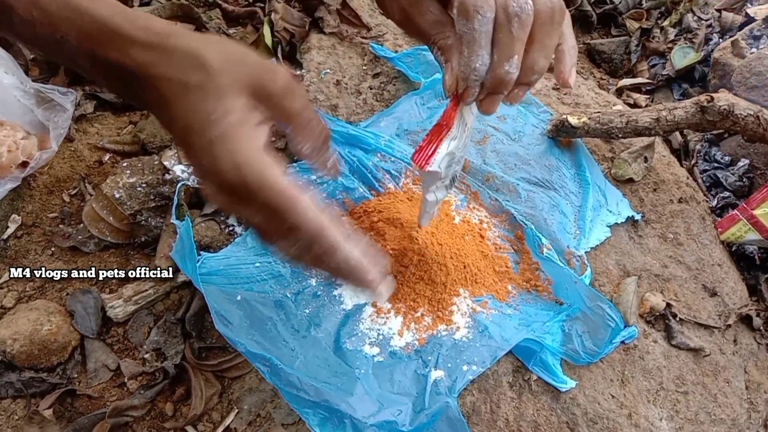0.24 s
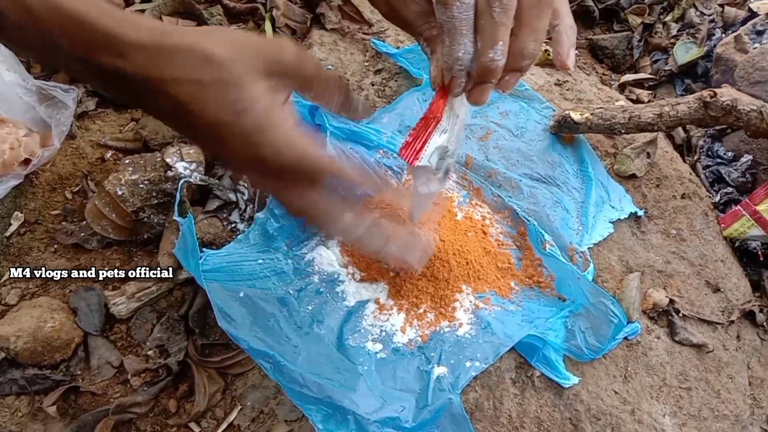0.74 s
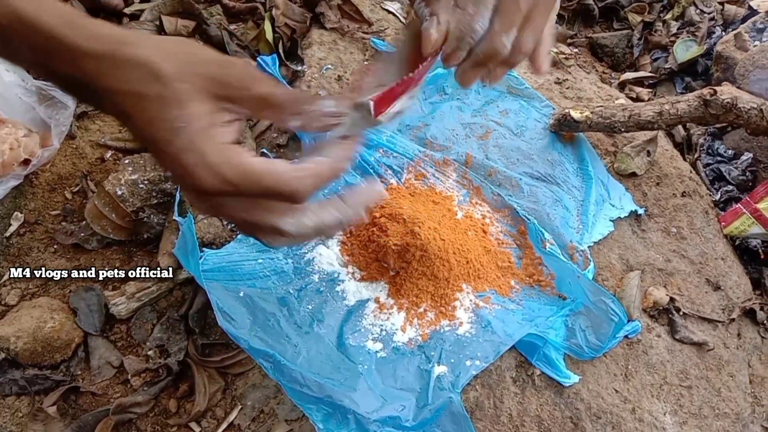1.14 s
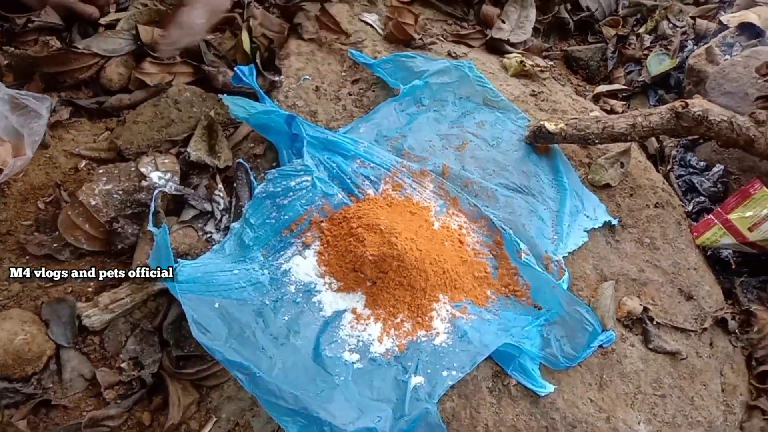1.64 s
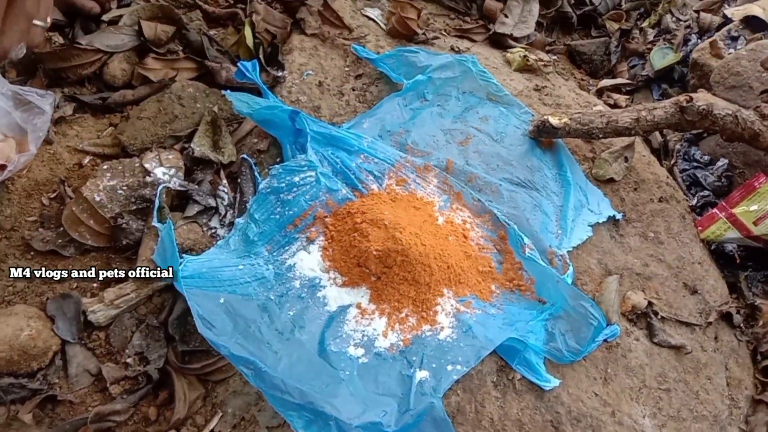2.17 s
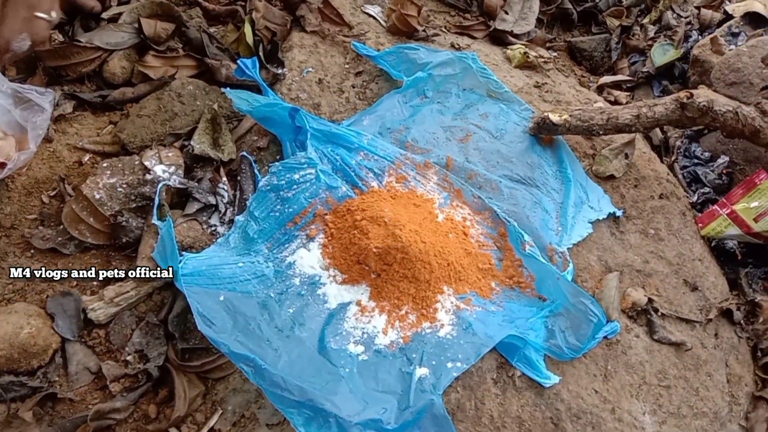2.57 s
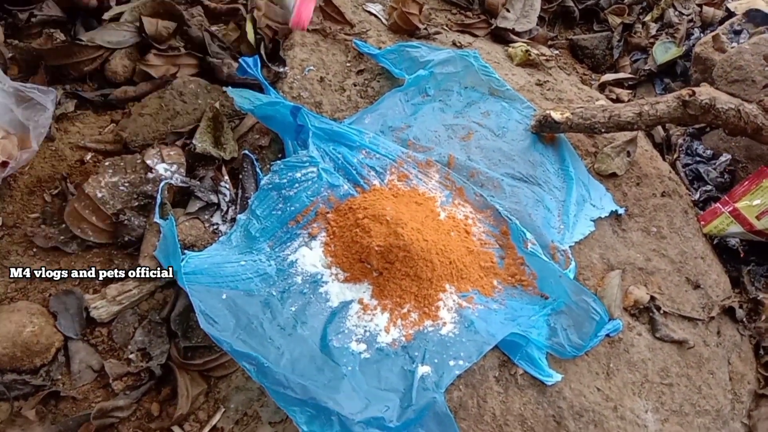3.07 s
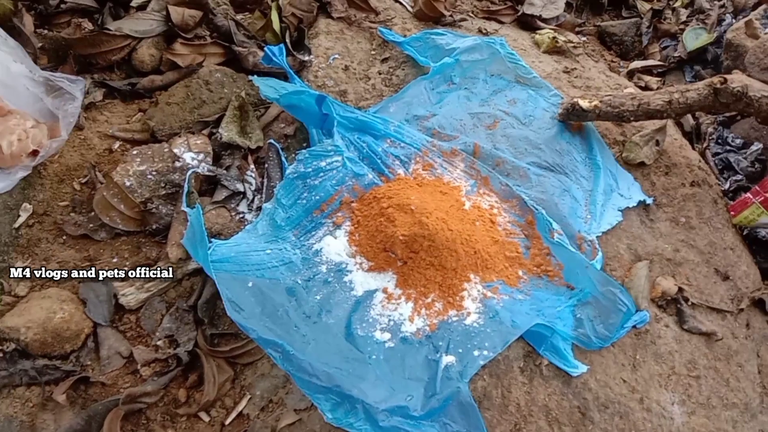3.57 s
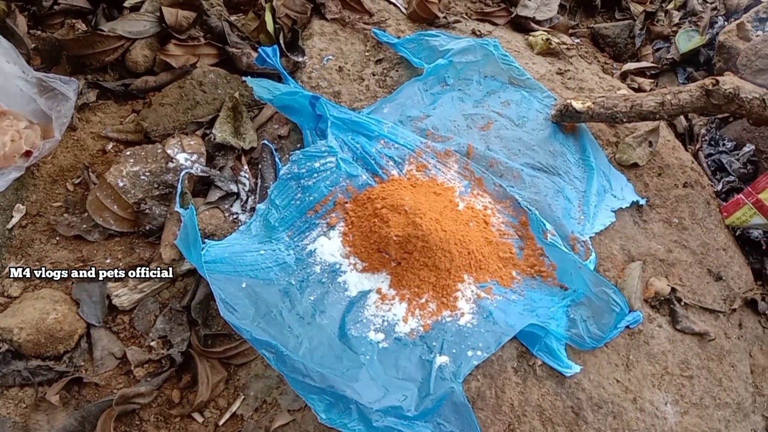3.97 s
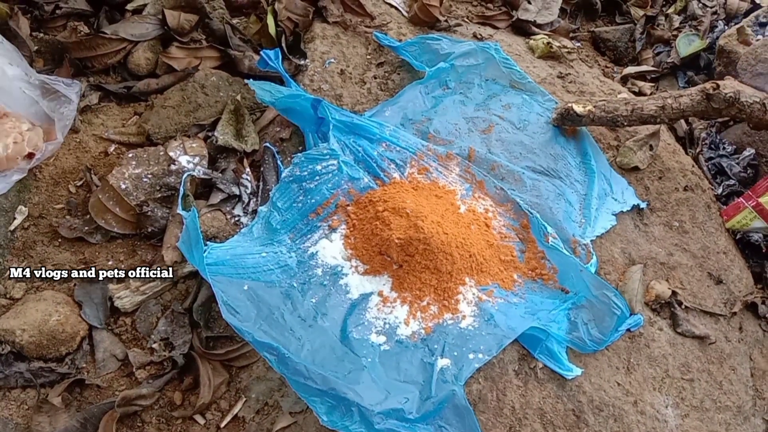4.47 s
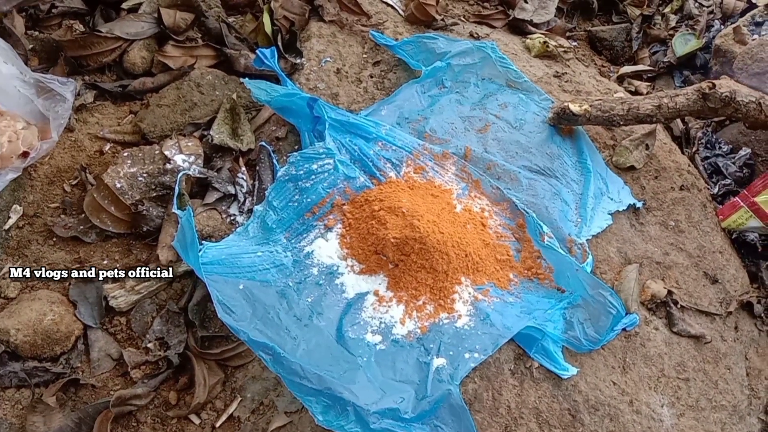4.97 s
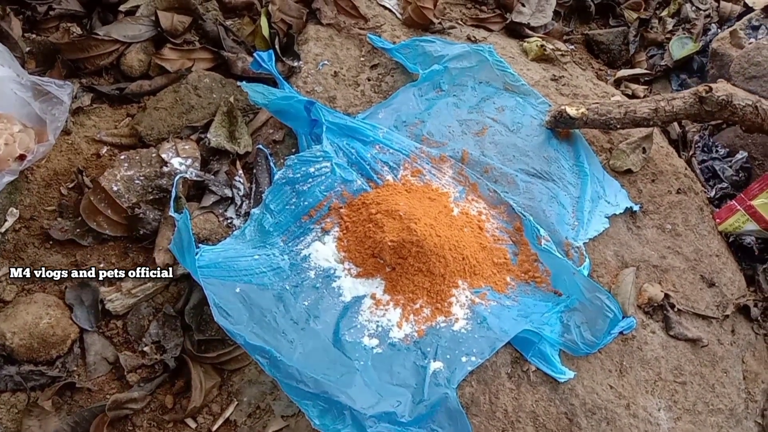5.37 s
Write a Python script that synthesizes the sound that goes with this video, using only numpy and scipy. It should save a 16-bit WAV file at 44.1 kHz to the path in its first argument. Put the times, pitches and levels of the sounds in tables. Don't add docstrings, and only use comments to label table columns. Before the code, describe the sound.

Hands tap a small plastic packet, lift and shake it, then loudly crush it close to the microphone over a very quiet outdoor background.

```python
import sys
import numpy as np
from scipy import signal
from scipy.io import wavfile
from scipy.ndimage import uniform_filter1d

SR = 44100
rng = np.random.default_rng(int(sys.argv[2]) if len(sys.argv) > 2 else 0)


def transcribe(signal):
    frames = np.atleast_2d(signal).T
    limited = np.clip(frames, -1, 1)
    pcm = np.round(limited * 32767).astype(np.int16)
    wavfile.write(sys.argv[1], SR, pcm)


def voltage_ratio(decibels):
    exponent = np.asarray(decibels, float) / 20
    return 10 ** exponent


N = 247842

# [f/Hz, level per Hz/dB]
AIR_COLOUR = [(200, -29), (320, 1), (1300, -7.5), (3300, -7), (4650, -10), (6100, -47), (6450, 5),
              (8300, -1), (9200, -12), (11500, -22), (11900, -8), (15700, -4)]
WIND_COLOUR = [(20, -47.5), (60, -5.5), (130, 1), (195, -5.5), (270, -9.5), (340, -16.5), (500, -57.5)]
LEAF_COLOUR = [(8500, -42.5), (9500, -18), (11500, -15), (12200, -1.5), (15700, -1.5)]
# [t/s, half length/s, level/dB]
PUFFS = [(0.154, 0.14, -66), (0.75, 0.09, -70.5), (1.187, 0.14, -68.5), (2.107, 0.041, -52.5),
         (2.72, 0.41, -65), (3.215, 0.13, -59.5), (4.002, 0.45, -67), (4.45, 0.109, -56),
         (4.76, 0.12, -49.5), (5.028, 0.038, -44.5), (5.35, 0.39, -62.5)]
# [t/s, f/Hz, level/dB]
WHINES = [
    [(0, 13400, -77), (.3, 12900, -78), (.8, 12300, -78), (1.0, 12300, -78)],
    [(2.88, 13300, -80), (3.0, 12700, -80), (3.25, 12400, -78), (3.8, 12080, -80), (4.35, 11770, -81)],
]
# [t/s, length/s, start f/Hz, end f/Hz, level/dB]
BIRDS = [
    (1.41, 0.068, 5030, 4740, -73),
    (1.496, 0.12, 5860, 5600, -76),
    (1.475, 0.063, 1300, 1300, -70.5),
    (1.578, 0.1, 1300, 1300, -68),
    (1.632, 0.024, 3830, 3800, -65),
    (1.835, 0.1, 6000, 5750, -74),
    (2.501, 0.089, 2250, 2250, -66),
    (2.536, .04, 3950, 4050, -70),
]
# [t/s, half length/s, level/dB]
LEAF_STIRS = [
    (0.096, .3, -76),
    (2.302, .35, -68.5),
    (2.855, .2, -60.5),
    (3.204, .2, -62),
    (4.1, .3, -83),
]
# [f/Hz, level per Hz/dB]
FILM_COLOUR = [(120, -44.5), (240, -19.5), (320, -5.5), (700, 0), (1300, 3.5), (3850, 2.5), (4550, -12),
               (5300, -1), (7000, 1.5), (8200, -5), (9300, -28.5), (11400, -30.5), (12000, -28),
               (15500, -24.5)]
RANGE_BORDERS = 1150, 4500, 9500
PANEL_PITCHES = 1300, 1610, 2250, 2910, 3450, 3820
# [t/s, length/s, level/dB, boom/dB, brightness/dB]
JOLTS = [
    (0, 0.061, -42, -6.5, -5.5),
    (.15, 0.058, -38, -9.5, -19),
    (.305, 0.084, -44.5, -18, -5),
    (.463, 0.069, -46, -6, -5.5),
    (2.608, .05, -47.5, -12, -9),
    (3.112, 0.062, -57.5, -11.5, -9),
    (4.62, 0.048, -43.5, -10, -6),
    (5.578, 0.042, -63.5, -26, -23),
]
STROKES = [(.632, 0.064, -55.5, -6.5, -4), (.68, 0.082, -51, -9, -11), (.83, 0.0095, -53.5, -17, -21),
           (1.07, 0.03, -58, -9, 0), (1.125, 0.016, -45, -5, -21), (1.18, 0.081, -57, -2.5, -51),
           (1.26, 0.068, -59, -18, -0.5), (2.02, 0.014, -54.5, -10, 4), (2.06, 0.098, -45, -7.5, -7),
           (2.19, 0.035, -44.5, -6.5, -9.5), (2.27, 0.19, -75, -27, 12), (2.37, 0.093, -60, -32, -0.5),
           (2.49, 0.15, -59.5, -14, -1.5), (2.72, .15, -66, -13, 2), (2.93, 0.075, -60.5, -19, 0),
           (3, 0.11, -60, -26, -4), (3.16, 0.17, -69, -2.5, 2.5), (4.358, 0.21, -50.5, -13.5, -3.5),
           (4.72, .1, -45, -8, -1.5), (4.498, 0.091, -36.5, -5, -0.5), (4.69, 0.4, -38, -8, -2.5),
           (4.86, 0.011, -34, -7.5, -3), (4.94, 0.056, -28, -9.5, -3.5), (5.02, 0.0033, -28.5, -0.5, -4.5),
           (5.09, 0.28, -31.5, -13.5, -3), (5.18, 0.18, -32, -7, -2), (5.36, 0.12, -27, -14.5, -2),
           (5.51, 0.04, -42, -16, -7)]
JOLT_SLOPES = 8300, 215, 3300
STROKE_SLOPES = 670, 3.9, 650
REST_LEVELS = -84.5, -69.5, -80.5, -71.5
# [t/s, f/Hz, level/dB]
THUMPS = [
    (1.189, 464, -32),
    (4.539, 520, -33),
    (4.574, 312, -27.5),
    (5.015, 420, -35),
    (5.072, 796, -16.5),
]
# [t/s, peak level/dB, share of lower treble/dB]
TICKS = [(0.1087, -37, -6), (0.1206, -29, -13), (0.4894, -39, -6), (0.594, -46, -8), (0.7163, -19.5, -8),
         (1.1877, -40, -4), (1.48, -26, -8), (1.5509, -49, -15), (1.7155, -29, -14), (2.2722, -46, -9),
         (2.4074, -43, -4), (2.5072, -27, -13), (2.7644, -62, -6), (3.0899, -19, -2), (3.1338, -36, -13),
         (3.3268, -69, -6), (4.5236, -23, -6), (4.581, -25, -6), (5.1083, -20, -6), (5.3073, -13, -8),
         (5.4051, -13, -5), (5.4246, -7, -16), (5.5344, -36, -6), (5.5608, -24, -4), (5.5712, -23, -15)]
# [t/s, ring f/Hz, level/dB, brightness/dB, time to fall 60 dB/s]
TAP_SNAPS = [(.0016, 1110, -30, -31.5, 0.015), (.025, 3690, -36, -43, 0.047),
             (.0344, 3870, -41, -18, 0.042), (.1491, 4130, -28.5, -27.5, 0.071),
             (.1542, 1660, -26.5, 9, 0.034), (.19, 1540, -39.5, 11, 0.023), (.3045, 1230, -29, -22, 0.027),
             (.3392, 4020, -36.5, -17, 0.071), (.462, 1160, -37.5, 2, 0.014),
             (.5933, 3870, -70.5, 21, 0.027), (.6576, 4020, -36, 3, 0.051), (.6757, 4220, -39, -20, 0.023),
             (.7176, 3600, -29.5, -11, 0.031), (.7335, 3730, -26.5, -29, 0.022),
             (.7614, 2930, -32, -32, 0.042), (.015, 3950, -40, 0.5, 0.0085), (.065, 2550, -58, 7, 0.015),
             (.532, 3000, -51, 5, 0.014), (.697, 3600, -45, 0, 0.0088), (.311, 3900, -48, -7, .03),
             (.468, 3970, -39, -4.5, 0.046), (.156, 3830, -38, -4, 0.014), (.819, 3600, -41, 5.5, 0.032)]
LIFT_SNAPS = [(1.0714, 1560, -43.5, 4.5, 0.022), (1.101, 1740, -40, 9, 0.029),
              (1.1256, 3060, -31, 5.5, 0.053), (1.145, 2500, -51, -2, 0.012),
              (1.178, 2800, -41.5, 1, 0.024), (1.1885, 3150, -24.5, 2.5, 0.026),
              (1.23, 2640, -31.5, -9, 0.013), (1.2488, 2940, -39, 2, 0.02),
              (1.2755, 2930, -39.5, 4.5, 0.069), (1.2997, 3600, -36, -3.5, 0.011),
              (1.482, 4050, -46.5, 5, 0.0069), (1.552, 3740, -55.5, 15, 0.015),
              (1.716, 3920, -54.5, 16, 0.022), (1.967, 1300, -59, 12, 0.0095)]
SHAKE_SNAPS = [(2.0864, 2920, -29.5, -4, 0.026), (2.1058, 2500, -25.5, 2, 0.014),
               (2.1194, 3150, -24.5, 6.5, 0.00645), (2.133, 3370, -30.5, 2, 0.013),
               (2.1413, 2390, -33, 3, 0.0075), (2.1697, 2470, -37, 4, 0.031),
               (2.193, 2370, -30, -1.5, 0.0033), (2.2108, 2920, -30, -32, 0.027),
               (2.2192, 1620, -31.5, 5, 0.015), (2.396, 3100, -42, 6.5, 0.015),
               (2.4315, 3080, -44, -1.5, 0.12), (2.4787, 2700, -43.5, -11, 0.029),
               (2.511, 2700, -46.5, 2, 0.013), (2.5514, 4080, -52, 4, 0.086),
               (2.6012, 3400, -30.5, -11, 0.021), (2.626, 1620, -39, 0.5, 0.027),
               (2.7977, 3750, -53.5, 4.5, 0.0586), (3.0259, 3670, -35, -35, 0.013),
               (3.0364, 3670, -38, -5.5, 0.042), (3.0916, 3980, -31, -18, 0.038),
               (3.1075, 3100, -33.5, 3.5, 0.028), (3.901, 3650, -55, 10, 0.023)]
GRAB_SNAPS = [(4.348, 3200, -48, 4, 0.041), (4.5086, 3190, -15, 2.5, 0.011), (4.525, 3520, -24, 9, 0.007),
              (4.5381, 1890, -10, 0.5, .004), (4.547, 3130, -19, 0, 0.015), (4.574, 1290, -12.5, -6, 0.009),
              (4.668, 1620, -29, 6.5, 0.012), (4.6805, 2320, -26.5, 7, 0.0089),
              (4.698, 1480, -25.5, 9.5, 0.0048), (4.7244, 1610, -35, -1, 0.025),
              (4.7555, 2330, -31, -6, 0.0061), (4.808, 2300, -20, 8, 0.0089),
              (4.858, 2300, -24.5, 0.5, 0.069), (4.875, 3090, -21, -2, 0.021),
              (4.8934, 1300, -9, -9, 0.0074), (4.901, 1400, -11, -22, 0.0074),
              (4.921, 2480, -13.5, -12, 0.0031), (4.9367, 2060, -13, 12, 0.0067),
              (4.957, 2250, -19, 8, 0.013), (4.9647, 2440, -19, 11, 0.0056),
              (4.9718, 1810, -13.5, 7, 0.005), (4.9931, 3890, -16, 4.5, 0.0054),
              (4.982, 3000, -27, 6, 0.0082), (5.0138, 2190, -9.5, 5, 0.011)]
CRUSH_SNAPS = [(5.046, 1390, -23, 7.5, 0.012), (5.0552, 3700, -21, 8, .0083),
               (5.0711, 1230, -13, -1, 0.0102), (5.12, 1820, -19, -16, .009),
               (5.137, 1760, -13, -26, 0.003), (5.2169, 1870, -20, -16, 0.035),
               (5.2498, 2650, -8, -12, .005), (5.2656, 3650, -39, 23, 0.023),
               (5.2921, 1520, -17, -15, 0.0081), (5.309, 1818, -23, 1, 0.02),
               (5.3265, 3220, -19.5, -11, 0.0073), (5.35, 1730, -20.5, -8, 0.0073),
               (5.338, 1950, -22.5, -11, .019), (5.3856, 1740, -11, -4, 0.0043),
               (5.4082, 1880, -17, -12, 0.0072), (5.4206, 3070, -14.5, -14, 0.0049),
               (5.4268, 2400, -19.5, -9, 0.0043), (5.4407, 1520, -24, -5, 0.073),
               (5.4533, 2040, -24, 8, 0.037), (5.469, 2630, -27.5, 22.5, 0.005),
               (5.532, 3420, -28, -18, 0.019), (5.5469, 3260, -25, -1, 0.0069),
               (5.5618, 1970, -33, -4, .011), (5.576, 2200, -29, -13, 0.012),
               (5.5771, 4360, -34, -18, 0.018)]
MORE_SNAPS = [(.165, 3940, -40, -3, 0.017), (.311, 3900, -43, -11, 0.025), (.468, 3930, -50, -3, 0.034),
              (.156, 3900, -33.5, -2, 0.012), (1.145, 2500, -53, 2, 0.012), (0.214, 3900, -48.5, 0, 0.027),
              (.805, 3600, -52, 1, .01), (1.0899, 2400, -41.5, 9, 0.012), (2.2004, 2600, -36, -10, 0.013),
              (2.327, 2940, -52.5, 14, 0.0091), (2.425, 3040, -46.5, 10.5, 0.008),
              (2.455, 2860, -44, -6, 0.012), (2.614, 3500, -44, 1, 0.0056), (2.639, 2530, -52, 6, 0.017),
              (3.023, 3700, -30.5, -10, 0.03), (3.029, 3600, -30, -18, 0.0054),
              (3.057, 3760, -45, -12, .04), (3.0936, 2930, -30, 0, 0.0098), (3.098, 2800, -30, 4, 0.01),
              (3.112, 2960, -36, -16.5, 0.023), (4.534, 2230, -19.5, 1, 0.011),
              (4.581, 1650, -22, 6, 0.01), (4.609, 2192, -28.5, -11, 0.011),
              (4.8617, 1800, -19.5, 8.5, 0.0075), (4.884, 1500, -18.5, -8, 0.014),
              (4.928, 2020, -16, 3, .007), (4.988, 1300, -10, -9, 0.0049), (5.024, 1920, -22, -9, 0.0091),
              (5.101, 1700, -25, 6.5, 0.0048), (5.142, 2200, -29, 0, 0.014), (5.194, 2160, -23, 4, .012),
              (5.257, 2520, -21, 2, .015), (5.382, 1970, -27, 2, .012), (5.448, 1980, -17, 4, 0.0047),
              (5.461, 2180, -21, 11, 0.0056), (5.487, 1820, -16.5, 1.5, 0.0041),
              (5.227, 1900, -23, -7, .01), (5.282, 2000, -26, -2, 0.0093), (5.365, 2000, -34, -5, 0.0088),
              (5.397, 2200, -20, -3, 0.0092), (5.497, 1510, -22, -1, 0.0063),
              (5.6013, 4500, -41, -5, 0.013)]


def evened(x):
    return x / np.sqrt(np.mean(x ** 2) + 1e-20)


def matched(x, other):
    return x * np.linalg.norm(other) / np.linalg.norm(x)


def drift(shape, size):
    return evened(uniform_filter1d(rng.standard_normal(shape), size=size))


def read(points, hz):
    f, value = np.transpose(points)
    return np.interp(np.log(hz + 1), np.log(f + 1), value)


def add(mix, s, sound):
    part = mix[max(round(s * SR), 0):][:len(sound)]
    part += sound[:len(part)]


def power_sum(levels_db):
    return 10 * np.log10(np.sum(voltage_ratio(levels_db) ** 2, axis=0))


def swells(rows, floor_db):
    t = np.arange(N) / SR
    return power_sum([floor_db + 0 * t] + [db - 6 * ((t - s) / half) ** 2 for s, half, db in rows])


def shaped_noise(points, size, patchy_db, flicker_db):
    frames, hz = 4 * N // size + 5, np.fft.rfftfreq(size, 1 / SR)
    a, b, patches = rng.standard_normal((frames, len(hz), 3)).T
    patches = uniform_filter1d(patches, size=size // 64, axis=0)
    patches = evened(uniform_filter1d(patches, size=12, axis=1))
    top_extra = (1 + 0.44 * (hz > 11700))[:, None]
    flicker = drift(frames, 5) * top_extra
    level_db = read(points, hz)[:, None] + patchy_db * patches + flicker_db * flicker
    spectra = (a + 1j * b) * voltage_ratio(level_db)
    return evened(signal.istft(spectra, nperseg=size, noverlap=3 * size // 4)[1][:N])


def open_air():
    return voltage_ratio(-61) * shaped_noise(AIR_COLOUR, size=512, patchy_db=.8, flicker_db=1.8)


def wind():
    level_db = swells(PUFFS, floor_db=-70.5)
    return voltage_ratio(level_db) * shaped_noise(WIND_COLOUR, size=2048, patchy_db=1.2, flicker_db=1.2)


def leaves():
    level_db = swells(LEAF_STIRS, floor_db=-120)
    return voltage_ratio(level_db) * shaped_noise(LEAF_COLOUR, size=256, patchy_db=2.5, flicker_db=2.7)


def cricket():
    t = np.arange(N) / SR
    pitch_hz, throbs_per_s, level_db = 6880, 10.65, -66
    fuzz = signal.lfilter([1], [1, -.985], rng.standard_normal(N) + 1j * rng.standard_normal(N))
    throb = np.clip(np.cos(2 * np.pi * throbs_per_s * t - 2.92) + .5, .1, 1)
    return voltage_ratio(level_db) * throb * evened((fuzz * np.exp(2j * np.pi * pitch_hz * t)).real)


def whines():
    t, out = np.arange(N) / SR, np.zeros(N)
    waver = 1 + .35 * drift(N, 900)
    for rows in WHINES:
        s, hz, db = np.transpose(rows)
        tone = np.sin(2 * np.pi * np.cumsum(np.interp(t, s, hz)) / SR)
        level_db = np.interp(t, s, db, left=-140, right=-140)
        out += voltage_ratio(level_db) * np.sqrt(2) * waver * tone
    return out


def birds():
    out = np.zeros(N)
    for s, length, hz0, hz1, db in BIRDS:
        count = round(length * SR)
        tone = np.sin(2 * np.pi * np.cumsum(np.linspace(hz0, hz1, count)) / SR)
        tone *= np.abs(1 + .35 * drift(count, 250))
        add(out, s, voltage_ratio(db) * np.sqrt(2) * tone * signal.windows.tukey(count, .7))
    return out


def causal(db):
    log_gain = np.log(voltage_ratio(np.maximum(np.r_[db, db[-2:0:-1]], -100)))
    return np.fft.ifft(np.exp(log_gain - 1j * signal.hilbert(log_gain).imag)).real[:1024]


def film_bands():
    hz = np.fft.rfftfreq(4096, 1 / SR)
    slopes = 24, 70, 70
    steps = [slope * np.log2((hz + 1) / f) for f, slope in zip(RANGE_BORDERS, slopes)]
    bands = []
    for low, high in zip([0] + steps, steps + [0]):
        cut_db = np.minimum(low, 0) - np.maximum(high, 0)
        response = causal(read(FILM_COLOUR, hz) + cut_db)
        bands.append(response / np.linalg.norm(response))
    return np.array(bands)


def through_film(drive):
    return signal.oaconvolve(drive, film_bands(), axes=1)[:, :N]


def grip():
    t, moves = np.arange(0, N / SR + .002, .002), []
    for rows, (rise, sag, fall) in ((JOLTS, JOLT_SLOPES), (STROKES, STROKE_SLOPES)):
        for s, length, db, boom_db, bright_db in rows:
            level_db = db - rise * np.maximum(s - t, 0)
            level_db = level_db - sag * np.clip(t - s, 0, length)
            level_db = level_db - fall * np.maximum(t - s - length, 0)
            fizz_db = bright_db - 1 - 0.025 * (db + 3.5)
            moves.append(level_db + np.array([[boom_db], [0], [bright_db], [fizz_db]]))
    levels_db = power_sum(moves + [np.array(REST_LEVELS)[:, None] + 0 * t])
    return t, *levels_db


def panels(per_s):
    t, out = np.arange(2500) / SR, np.zeros(N)
    for hz in np.repeat(PANEL_PITCHES, 3) * rng.uniform(0.97, 1.03, 3 * len(PANEL_PITCHES)):
        sizes = voltage_ratio(3.1 * np.minimum(rng.exponential(1, N), 4))
        flicks = sizes * (rng.random(N) < per_s / SR)
        ring = np.sin(2 * np.pi * hz * t) * voltage_ratio(-60 * t / 0.035) * np.minimum(t / 0.0015, 1)
        out += signal.oaconvolve(flicks, ring)[:N]
    return evened(out)


def rustle():
    t = np.arange(N) / SR
    sizes = voltage_ratio(5.0 * np.minimum(rng.exponential(1, N), 1.4)) * (rng.random(N) < 500 / SR)
    clumps = signal.oaconvolve(sizes ** 2, voltage_ratio(-120 * t[:1500] / 0.005))[:N]
    smooth_share = np.array([[.6], [.6], [.9], [1.6]])
    drive = np.sqrt(np.maximum(clumps / clumps.mean(), 0) + smooth_share) * rng.standard_normal((4, N))
    drive *= voltage_ratio(2.45 * drift((4, N), 260))
    s, *levels_db = grip()
    gentle = np.clip((-27.0 - np.interp(t, s, levels_db[1])) / 30, .1, .9)
    drive[1] = np.sqrt(1 - gentle) * evened(drive[1]) + 0.19 * np.sqrt(gentle) * panels(per_s=99.0)
    return sum(voltage_ratio(np.interp(t, s, db)) * evened(band) for db, band in zip(levels_db, through_film(drive)))


def thumps():
    t, out = np.arange(2000) / SR, np.zeros(N)
    for s, hz, db in THUMPS:
        fade = voltage_ratio(db - 20 * t * hz / 4.6)
        add(out, s, fade * np.sin(2 * np.pi * hz * t) * np.minimum(t * hz * 2.5, 1))
    return out


def ticks():
    t, drive = np.arange(600) / SR, np.zeros((4, N))
    for s, db, low_db in TICKS:
        burst = voltage_ratio(db - 13.0 - 60 * t / 0.0086) * rng.standard_normal(600)
        add(drive[2], s, voltage_ratio(low_db) * burst)
        add(drive[3], s, burst)
    return through_film(drive).sum(0)


def crack_volley(t, t60):
    u = t / np.clip(t60 / 14, .0004, .006)
    settling = voltage_ratio(-24 - 60 * t / 0.54) * np.minimum(u, 1)
    shape = u * np.exp(1 - u) + settling
    noise = rng.standard_normal(len(t))
    cracks = noise * voltage_ratio(2.05 * (u < 1.6) + 4.6 * drift(len(t), 14)) * shape
    main_break = 0.71 * np.sign(noise[0]) * np.linalg.norm(cracks) * min(0.0075 / t60, 1)
    cracks[round(SR * t[u < 1][-1])] += main_break
    return matched(cracks, shape)


def panel_ring(cracks, hz):
    r, turn = np.exp(-np.pi * (120 + 0.024 * hz) / SR), 2 * np.pi * hz / SR
    return matched(signal.lfilter([1, 0, -1], [1, -2 * r * np.cos(turn), r * r], cracks), cracks)


def snaps():
    t, drive, rings = np.arange(2000) / SR, np.zeros((4, N)), np.zeros(N)
    times, pouch_db, body_db = grip()[:3]
    for s, hz, db, bright_db, t60 in TAP_SNAPS + LIFT_SNAPS + SHAKE_SNAPS + GRAB_SNAPS + CRUSH_SNAPS + MORE_SNAPS:
        start = s - .0008
        cracks = crack_volley(t, t60)
        add(rings, start, voltage_ratio(db - 4.0) * panel_ring(cracks, hz))
        mouth = matched(signal.lfilter(*signal.iirpeak(3822, 16., SR), cracks), cracks)
        add(rings, start, voltage_ratio(db - 13 - 0.15 * (db + 40)) * mouth)
        boom_db = db + np.interp(s, times, pouch_db - body_db) - 2.0 * np.log2(hz / 2000)
        edge_db = db + bright_db
        fizz_db = edge_db - 7.5 - 0.25 * (db + 32.0)
        body = matched(signal.lfilter(*signal.butter(1, hz * 1.35, "high", fs=SR), cracks), cracks)
        add(drive[0], start, voltage_ratio(boom_db - 6.5) * cracks)
        add(drive[1], start, voltage_ratio(db - 8.5) * body)
        add(drive[2], start, voltage_ratio(edge_db - 10.0) * cracks)
        add(drive[3], start, voltage_ratio(fizz_db - 4.5) * cracks)
    return through_film(drive).sum(0) + rings


def scene():
    background = open_air() + wind() + leaves() + cricket() + whines() + birds()
    packet = rustle() + thumps() + ticks() + snaps()
    return (background + packet)[None]


def denoise(x):
    z = signal.stft(x, nperseg=512, noverlap=384)[2]
    held = signal.lfilter([.12], [1, -.88], abs(z) ** 2, axis=-1)
    background = np.percentile(held, 35, axis=-1, keepdims=True)
    background = uniform_filter1d(background, size=9, axis=1)
    gain = np.sqrt(np.clip(1 - 1.5 * background / (held + 1e-20), voltage_ratio(-20), 1))
    return signal.istft(z * gain, nperseg=512, noverlap=384)[1][:, :N]


def low_pass(x):
    return signal.sosfilt(signal.butter(12, 16990, fs=SR, output="sos"), x)


def record(dry):
    soft = np.tanh(denoise(dry))
    limited = signal.oaconvolve(soft, signal.firwin(301, 15900, fs=SR)[None], "same")
    return low_pass(limited + voltage_ratio(-64) * soft)


dry = scene()
out = record(dry)
transcribe(out)
```